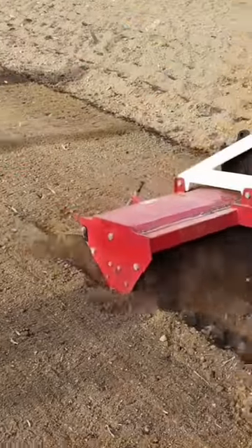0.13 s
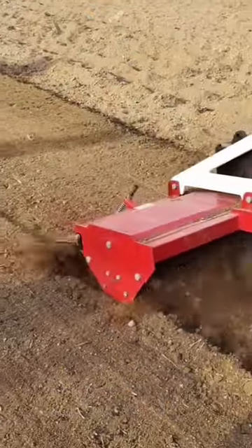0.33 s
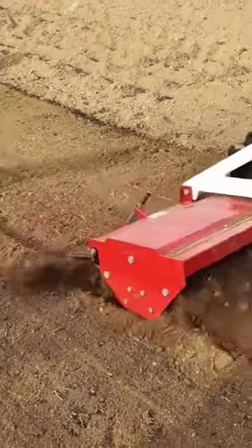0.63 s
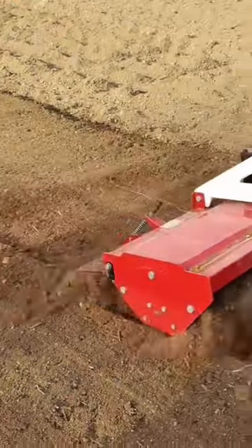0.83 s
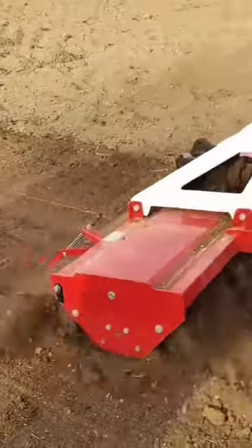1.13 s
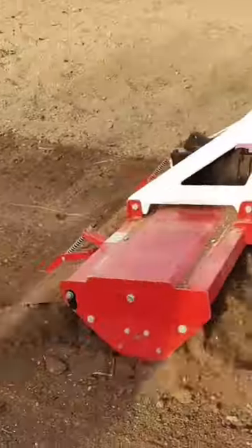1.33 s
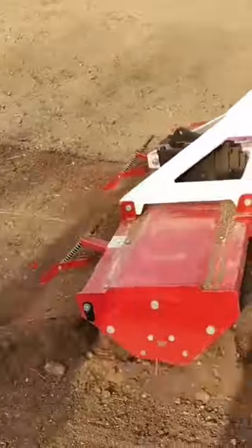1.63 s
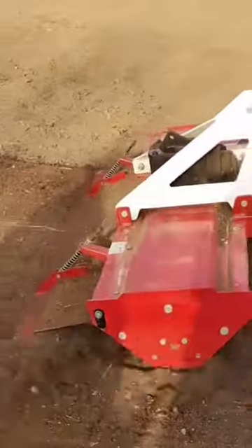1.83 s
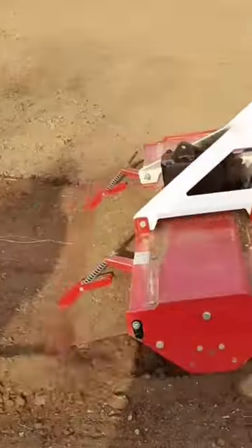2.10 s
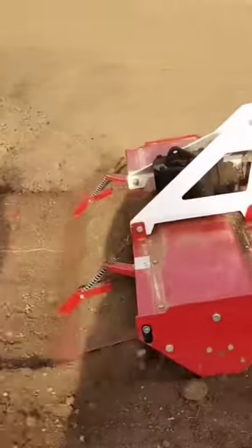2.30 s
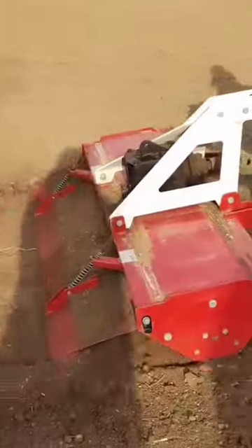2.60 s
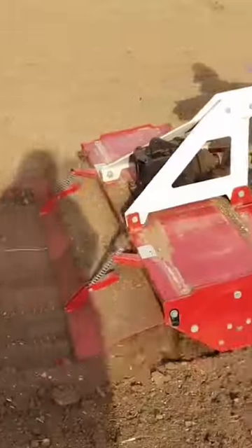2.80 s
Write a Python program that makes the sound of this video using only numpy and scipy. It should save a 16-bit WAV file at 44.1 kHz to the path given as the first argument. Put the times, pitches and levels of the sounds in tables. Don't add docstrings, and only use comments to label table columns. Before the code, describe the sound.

Diesel tractor thumping about sixteen beats a second, with gritty soil churn and clods knocking steel

```python
import sys
import numpy as np
from scipy import signal
from scipy.fft import rfft, irfft
from scipy.io import wavfile
from scipy.ndimage import uniform_filter1d

SR = 44100
rng = np.random.default_rng(int(sys.argv[2]) if len(sys.argv) > 2 else 0)


def boost_factor(decibels):
    exponent = np.asarray(decibels, float) / 20
    return 10 ** exponent


def to_wav(s):
    ch = np.atleast_2d(s).T
    pcm = np.round(np.clip(ch, -1, 1) * 32767)
    wavfile.write(sys.argv[1], SR, pcm.astype(np.int16))


N = 130095

FIRING_HZ, FIRST_S = 16.439, .0405
SIDE = np.array([[1], [-1]])


def level(x, db):
    return x * boost_factor(db) / np.sqrt(np.mean(x ** 2))


def band(x, hz, width):
    return signal.lfilter(*signal.iirpeak(hz, hz / width, fs=SR), x)


def walk(rate):
    k = int(SR / rate)
    steps = np.repeat(rng.standard_normal(N // k + 1), k)
    return 1.6 * uniform_filter1d(uniform_filter1d(steps, k), k)[:N]


def curve(table, col):
    points = np.array(table)
    return np.interp(np.arange(N) / SR, points[:, 0], points[:, col])


def strike(times, sizes, shape):
    hits = np.zeros(N + 2 * SR, complex)
    np.add.at(hits, ((np.asarray(times) + 1) * SR).astype(int), sizes)
    return signal.fftconvolve(hits, shape)[SR:SR + N]


def firing_times():
    early_s, settle_s = .003, 0.43
    times = FIRST_S + np.arange(-1, 48) / FIRING_HZ
    return times - early_s * np.exp(-times / settle_s)


# t/s, f/Hz, exhaust level/dB
EXHAUST_PARTIAL = [(0.0, 182.8, -19.5), (0.09, 178.8, -24.5), (0.44, 183, -23), (0.56, 177.7, -23),
                   (0.65, 181.9, -23), (0.76, 183.9, -23.5), (1.45, 186.4, -23), (1.6, 178.9, -24),
                   (1.72, 183.5, -22.5), (2.74, 184.1, -24.5), (2.88, 182.2, -24.5), (2.95, 188, -19.5)]
# centre t/s, f/Hz, half length/s, level/dB
PIPE_RINGS = [
    (.032, 142, .011, -9),
    (.031, 190, .006, -17),
    (.053, 193, .008, -13),
    (.0035, 425, .0032, -12),
    (.011, 355, .005, -20),
    (.0215, 385, .003, -12),
]


def exhaust(times):
    from_hz, to_hz, fall_at_s, fall_s = 212, 150, .0135, .0022
    lead_s, attack_s, hold_s, release_s, sag_db = .004, .012, .027, .0035, -3.5
    t = np.arange(SR // 10) / SR
    fallen = 1 / (1 + np.exp(-(t - fall_at_s) / fall_s))
    hz = from_hz + (to_hz - from_hz) * fallen
    attack = np.sin(np.clip(t / attack_s, 0, 1) * np.pi / 2) ** 2
    release = np.exp(-np.maximum(t - hold_s, 0) / release_s)
    body = attack * boost_factor(sag_db * fallen) * release
    thump = body * np.exp(2j * np.pi * np.cumsum(hz) / SR)

    slip = 2 * np.pi * np.cumsum(curve(EXHAUST_PARTIAL, 1) - 11 * FIRING_HZ) / SR
    chance = rng.standard_normal((len(times), 2, len(PIPE_RINGS) + 2))
    at = np.clip(times * SR, 0, N - 1).astype(int)
    unsteady = .3 + 1.2 * np.exp(-times / .35)
    phase = slip[at] + unsteady * chance[:, 1, -1]
    size = boost_factor(curve(EXHAUST_PARTIAL, 2)[at] + 10.5 + 0.81 * chance[:, 0, -1]) * np.exp(1j * phase)
    out = strike(times - lead_s, size, thump)
    for k, (centre, hz, half, db) in enumerate(PIPE_RINGS):
        vary = boost_factor(db + 2.2 * chance[:, 0, k]) * np.exp(.3j * chance[:, 1, k])
        swell = np.exp(2j * np.pi * hz * t - ((t - .05) / half) ** 2)
        out += strike(times + centre - .05, size * vary, swell)
    high_pass = signal.butter(N=3, Wn=122, btype="high", fs=SR, output="sos")
    return signal.sosfiltfilt(high_pass, out.imag)


# t/s, clatter level/dB, soil level/dB, dull clatter extra level/dB
DRAWING_AWAY = [(0, 5.5, 3, 1), (.25, 1.5, 3, 3), (.6, 3, 2.5, -2), (1.2, 1.5, 1, -3.5),
                (2.0, -2.5, -1, -1), (2.95, -3, -1.5, -2.5)]
# delay t/s, centre f/Hz, width/Hz, decay/s, level/dB
BLOWS = [
    (0.05646, 617, 140, 0.0039, -41.5),
    (0.0183, 646, 105, 0.003, -46.5),
    (0.0419, 546, 186, 0.0069, -40),
    (0.0448, 1150, 200, 0.004, -39),
    (0.0463, 1370, 150, 0.0048, -44.5),
    (0.0585, 1200, 240, 0.0067, -47),
    (.046, 3300, 2000, 0.0033, -61.5),
    (0.015, 1000, 430, 0.0043, -44),
    (0.0455, 1900, 1000, 0.0029, -50.5),
]


def clatter(times):
    t = np.arange(SR // 10) / SR
    out = 0
    for delay, hz, width, decay, db in BLOWS:
        chance = rng.standard_normal((len(times), 2))
        since = (np.arange(N) / SR - FIRST_S - delay) % (1 / FIRING_HZ)
        burst = t / decay * np.exp(-t / decay)
        gate = strike(times + delay + .0015 * chance[:, 0], boost_factor(1.0 * chance[:, 1]), burst).real
        wander = .25 * walk(40) + .6 - .3 * np.minimum(since / decay, 5)
        tone = np.sin(2 * np.pi * np.cumsum(hz + width * wander) / SR)
        dull = boost_factor(curve(DRAWING_AWAY, 3) * (hz < 800))
        out = out + level(gate * tone, db) * dull
    return out * boost_factor(curve(DRAWING_AWAY, 1))


def soil_swells():
    shared = 1.0 * walk(3)
    centres = 100 * 2 ** np.arange(0, 7.3, 1 / 3)
    return [(hz, boost_factor(shared * min(hz / 4000, 2) + 2.4 * walk(11.83))) for hz in centres]


# f/Hz, density level/dB per Hz
SOIL_SPECTRUM = [(90, -1), (300, 2.5), (700, -12.5), (1400, -13.5), (1600, -13.5), (4500, -33.5),
                 (9000, -37), (15000, -47)]
# f/Hz, width/Hz, level/dB
HOOD_MODES = [(399.3, 39, -44.5), (1159.4, 27, -43), (1337, 83, -44), (980, 270, -38.5), (2410, 190, -53.5),
              (3070, 82, -55.5), (3820, 150, -54.5), (6756, 900, -59)]


def soil(swells):
    grit = rng.standard_normal(N) * boost_factor(0.95 * rng.exponential(size=N)) * (rng.random(N) < .25)
    points = np.array(SOIL_SPECTRUM)
    out = 0
    for hz, swell in swells:
        db = np.interp(np.log(hz), np.log(points[:, 0]), points[:, 1]) + 10 * np.log10(hz)
        grains = np.roll(grit, int(hz * 7))
        grains = band(band(grains, hz, 0.38 * hz), hz, 0.38 * hz)
        out = out + swell * level(grains, db)
    out = level(out, -38)
    for hz, width, db in HOOD_MODES:
        mode = level(band(np.roll(grit, int(hz * 5)), hz, width), db)
        out = out + boost_factor(2.54 * walk(14)) * mode
    return out * boost_factor(curve(DRAWING_AWAY, 2))


def ring(hz, t60, rise):
    t = np.arange(SR // 5) / SR
    return (1 - np.exp(-t / rise)) * np.exp(2j * np.pi * hz * t - np.log(1000) * t / t60)


# t/s, peak level/dB, f/Hz
CLOD_HITS = [(0.084, -36, 573), (0.391, -19.5, 567), (0.513, -15.5, 594), (0.543, -36, 565),
             (0.572, -25, 1165), (1.059, -27, 1320), (1.121, -24, 1150), (1.303, -25.5, 1180),
             (1.545, -24, 497), (1.604, -24, 580), (1.726, -27, 980), (2.092, -32, 976), (2.515, -27, 652),
             (2.795, -24, 1025), (2.882, -22.5, 1047)]


def clods():
    out = 0
    for s, db, hz in CLOD_HITS:
        knock = ring(hz, .04, 0.0009) + .5 * ring(1.6 * hz, 0.013, 0.00027)
        out = out + strike([s], boost_factor(db + 4), knock).imag
    return out


# t/s, f/Hz, length/s, level/dB
SQUEAKS = [(0.059, 15400, .04, -66), (0.213, 14300, .05, -66), (.55, 13600, .06, -66),
           (.68, 13400, .06, -63), (.73, 14600, .04, -65), (1.28, 14000, .04, -68), (1.85, 14500, .02, -66),
           (2.19, 14100, .02, -66), (2.62, 14900, .04, -69), (1.38, 15500, .09, -64),
           (2.106, 15500, .07, -60), (2.86, 15000, .04, -77)]


def spring_squeaks():
    t = np.arange(N) / SR
    out = 0
    for s, hz, length, db in SQUEAKS:
        tone = band(band(rng.standard_normal(N), hz, 250), hz, 250)
        out = out + level(tone, db - 1) * np.exp(-((t - s) / length * 2) ** 4)
    return out


def wind():
    gust = boost_factor(1.5 * walk(14))
    low_pass = signal.butter(N=2, Wn=68, fs=SR)
    mid, side = (level(signal.lfilter(*low_pass, rng.standard_normal(N)), -41.5) * gust for _ in range(2))
    return mid + 0.9 * band(mid, 91, 43) + .3 * uniform_filter1d(side, size=250) * SIDE


# f/Hz, left lead/rad, unrelated share/0-1, left minus right level/dB
PORT_PAIR = [(169, 3, 0, 5), (623, -0.11, 0.43, -1.5), (1276, 2.06, 0.2, 4), (2060, 4.5, 0.68, 0),
             (3500, 4.5, 0.54, -1.5), (6300, 7.5, 1, 0.5), (7900, 5.5, 1, 3), (10300, -3, 0.57, 5)]


def scene():
    times = firing_times()
    pipe = exhaust(times)
    swells = soil_swells()
    direct = rfft(clatter(times) + soil(swells) + clods())
    scattered = rfft(np.array([soil(swells) + clatter(times) for _ in range(2)]))

    log_hz = np.log(np.arange(len(direct)) * SR / N + 1)
    ports = np.array(PORT_PAIR)
    lead, share, tilt_db = (np.interp(log_hz, np.log(ports[:, 0]), ports[:, k]) for k in (1, 2, 3))
    share = np.clip(share, 0, 1)
    ears = np.sqrt(1 - share) * direct * np.exp(.5j * lead * SIDE) + np.sqrt(share) * scattered
    machine = irfft(ears * boost_factor(tilt_db * SIDE / 2), N)
    half_lag_s = 6e-5
    return machine + wind() + pipe + half_lag_s * SR * np.gradient(pipe) * SIDE


def patches(shape, bins, frames):
    field = uniform_filter1d(uniform_filter1d(rng.standard_normal(shape), bins, axis=0), frames, axis=1)
    return field / field.std()


# f/Hz, warble level/dB, share of time a band is missing/0-1 in the sum, in the difference
PATCHINESS = [(450, 0, 0, 0), (1100, 3, 0, 0), (4500, 5, .02, .03), (5700, 5, .2, .2), (6800, 5, .1, .12),
              (8100, 5, .68, .2), (9300, 5, .35, .55), (10800, 5, .55, .96), (12500, 5, .55, .7),
              (13600, 5, .9, .55), (16000, 5, .98, .4)]


def thin(dry):
    turn = np.array([[1, 1], [1, -0.995]]) / np.sqrt(2)
    fade_in = np.minimum(np.arange(N) / 200, 1)
    hz, _, spec = signal.stft(turn @ (dry * fade_in), SR, nperseg=1024, noverlap=768)
    points = np.array(PATCHINESS)
    log_points = np.log(points[:, 0])
    warble_db, *missing = (np.interp(np.log(hz + 1), log_points, points[:, k])[:, None] for k in (1, 2, 3))
    missing = np.clip(missing, .001, .995)
    field = np.array([patches((len(hz), spec.shape[2]), bins=6, frames=16) for _ in range(2)])
    keep = 1 / (1 + np.exp(-12 * (1.7 * field - np.log(missing / (1 - missing)))))
    warble = warble_db * patches(spec.shape[1:], bins=3, frames=6) - warble_db ** 2 * np.log(10) / 20
    gain = boost_factor(warble) * keep
    gain[1, hz > 13100] *= boost_factor(9)
    return turn @ signal.istft(spec * gain, SR, nperseg=1024, noverlap=768)[1][:, :N]


def roll_off(x):
    return signal.sosfilt(signal.butter(12, 15850, fs=SR, output="sos"), x)


def record(dry):
    mix = thin(dry) + spring_squeaks()
    return roll_off(mix)


dry = scene()
out = record(dry)
to_wav(out)
```